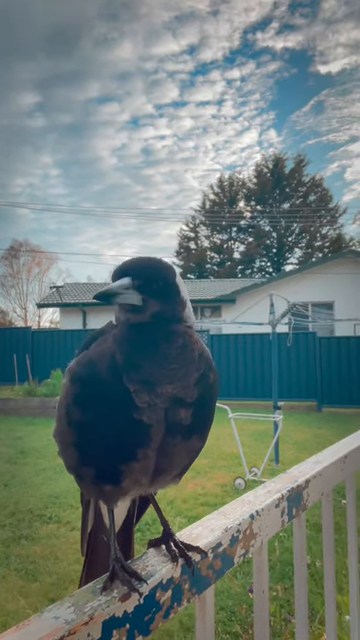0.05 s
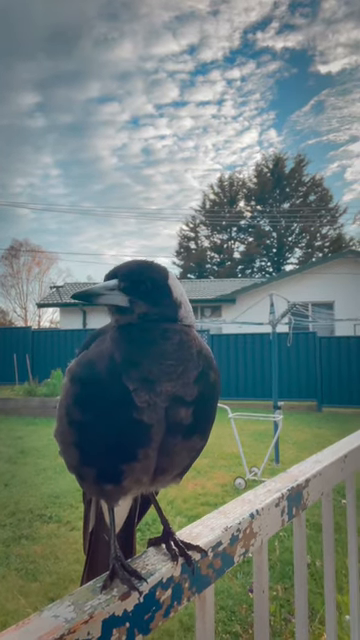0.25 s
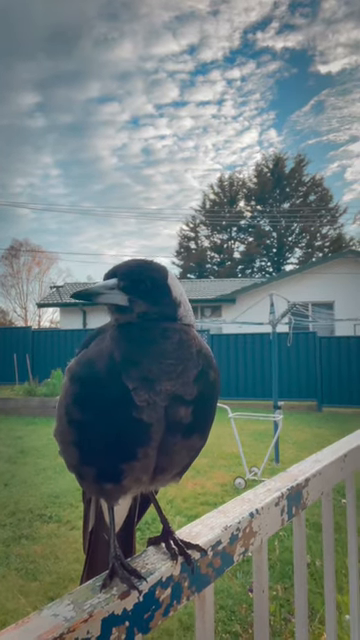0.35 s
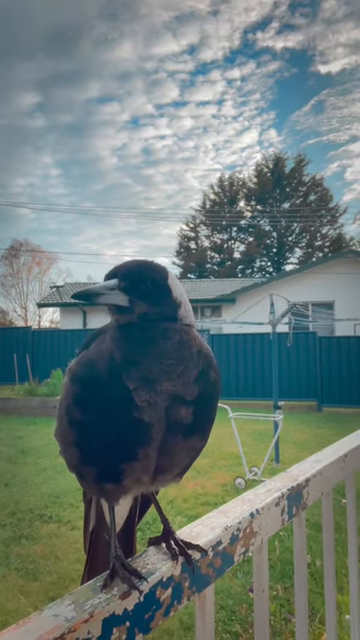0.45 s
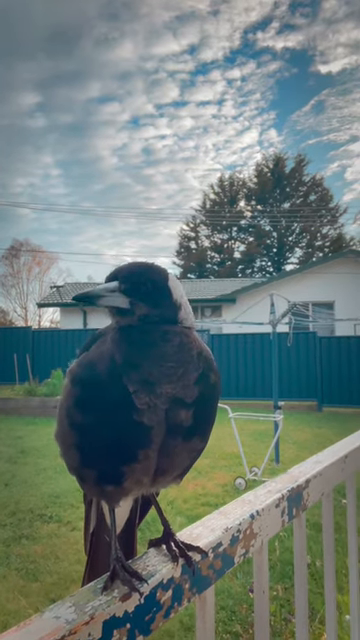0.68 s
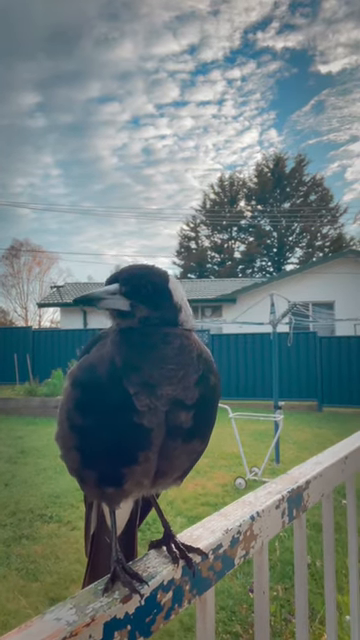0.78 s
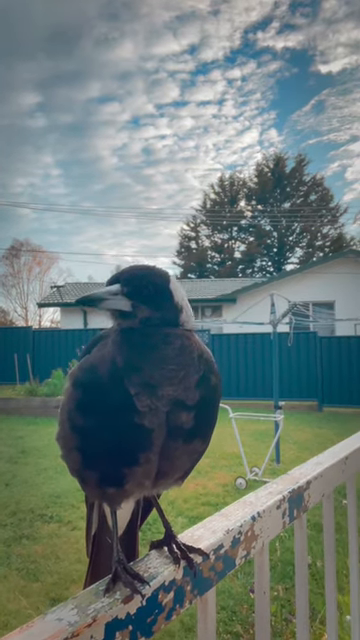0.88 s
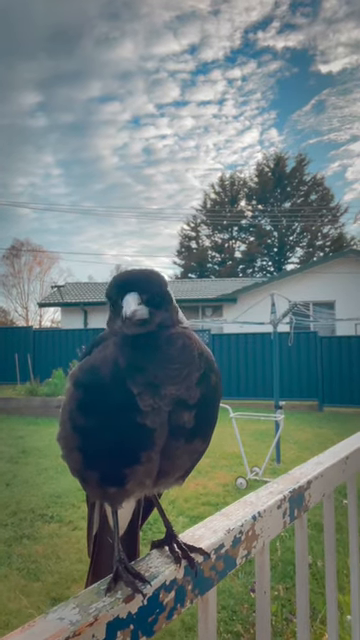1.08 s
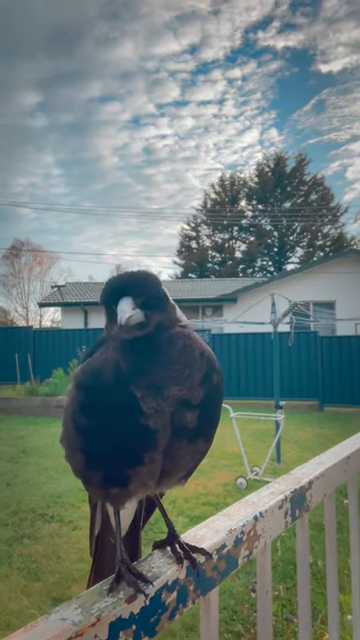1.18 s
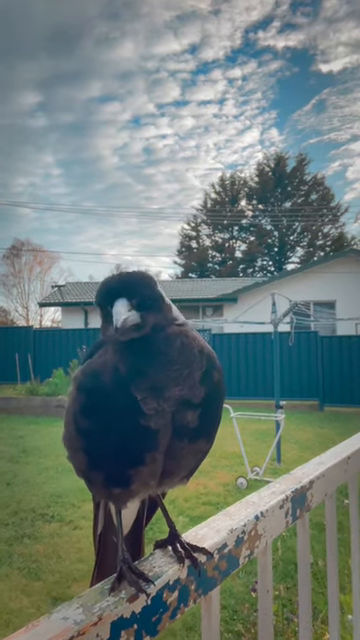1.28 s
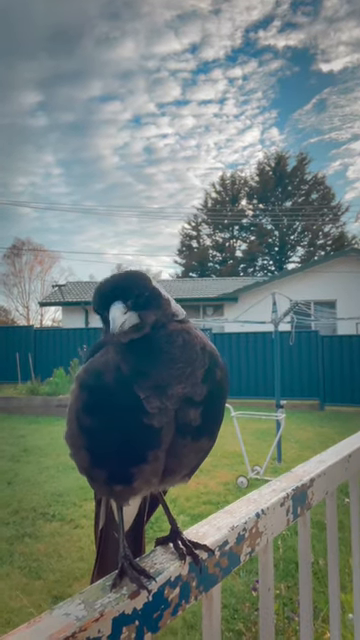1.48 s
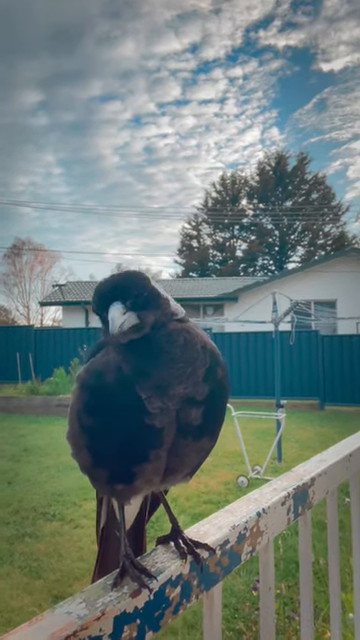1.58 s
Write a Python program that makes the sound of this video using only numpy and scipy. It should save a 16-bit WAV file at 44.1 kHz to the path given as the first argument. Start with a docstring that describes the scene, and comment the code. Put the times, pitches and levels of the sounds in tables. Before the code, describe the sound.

A magpie calls three husky, warbling whistled notes in a quiet backyard, close by

```python
"""A magpie in a backyard gives three husky notes: a falling one, a long rising one, a fainter falling one.
Each is a whistle with overtones whose pitch warbles; it flutters about 240 times a second, with hoarse noise
and rasping air, and passes fixed resonances. A second voice throbs above the falling note; added layers give
the rising note's warble peaks and the faint note's ringing echo. Near surfaces, fences and walls echo it all.
The echo of an earlier call dies away at the start, over far traffic rumble, air hiss and one far whistle."""
import sys
import numpy as np
from scipy import signal
from scipy.fft import rfft, irfft, next_fast_len
from scipy.io import wavfile
from scipy.ndimage import map_coordinates

SR = 44100
rng = np.random.default_rng(int(sys.argv[2]) if len(sys.argv) > 2 else 0)


def store_wav(level_fs):
    """Save 16-bit WAV to argv[1]."""
    pcm = np.round(np.clip(np.atleast_2d(level_fs), -1, 1) * 32767)
    wavfile.write(sys.argv[1], SR, pcm.T.astype(np.int16))


N = 72765  # length in samples
TOP_HZ = 15700  # band limit


def amp(db):
    """Decibels to a linear gain."""
    return 10 ** (np.asarray(db) / 20)


def unit(x):
    """x scaled to an rms of 1."""
    return x / np.sqrt(np.mean(x ** 2) + 1e-20)


def along(points, hz):
    """Read a curve of (frequency_hz, value) points on a log frequency axis."""
    point_hz, value = np.transpose(points)
    return np.interp(np.log(hz + 1), np.log(point_hz + 1), value)


def wobble(rate_hz):
    """A smooth random curve with rate_hz random knots a second."""
    knots = rng.standard_normal(N // 16)
    return map_coordinates(knots, [np.arange(N) * rate_hz / SR])


def filtered(x, response):
    """Shape x in the frequency domain by a complex response of frequency in Hz."""
    size = next_fast_len(N + SR // 2)
    hz = np.fft.rfftfreq(size, 1 / SR)
    return irfft(rfft(x, size) * response(hz), size)[..., :N]


def rush(spectrum, alike):
    """Stereo noise of rms 1; the mid and side shares set the left-right likeness at each frequency."""
    def shares(hz):
        turn = np.arccos(np.clip(along(alike, hz), -1, 1)) / 2
        return amp(along(spectrum, hz)) * [np.cos(turn), np.sin(turn)]

    mid, side = filtered(rng.standard_normal((2, N)), shares)
    return unit(np.array([mid + side, mid - side]))


def gate(start_s, end_s):
    """A smooth switch on and off, with short squared ramps."""
    edge_s = 0.0014
    t = np.arange(N) / SR
    return np.clip(np.minimum(t - start_s, end_s - t) / edge_s, 0, 1) ** 2


def background():
    """Swelling traffic rumble and unsteady air hiss from shaped noise, and one far whistle from a sine."""
    # noise colours: frequency_hz, density_db (per Hz, relative)
    rumble_spectrum = [(18, -67), (30, -30), (46, 0), (66, 2.5), (124, -8.5), (151, -16.5), (300, -23.5),
                       (390, -45), (660, -120)]
    air_spectrum = [(120, -53), (200, -16), (400, -8), (756, -5), (957, -6.5), (1470, -17), (2760, -23),
                    (7100, -33.5), (11200, -36), (14500, -43), (22000, -120)]
    # stereo width: frequency_hz, left-right likeness (-1 to 1)
    likeness = [(60, 1), (130, 0.94), (260, 0.69), (550, -0.68), (1200, 0.1), (2400, -0.23), (5000, 0.7),
                (10000, 0.44), (12000, -0.73), (15000, 0.19)]
    # far whistle: start_s, end_s, pitch_hz, level_db
    start_s, end_s, pitch_hz, level_db = (1.405, 1.47, 1530, -81)
    rumble_db, air_db, pan_db = -64.5, -73, .5  # the pan raises the left and lowers the right
    tone = np.sin(2 * np.pi * pitch_hz * np.arange(N) / SR)
    whistle = amp(level_db) * tone * gate(start_s, end_s)
    rumble = amp(rumble_db + 2.2 * wobble(3.3)) * rush(rumble_spectrum, likeness)
    air = amp(air_db + 0.79 * wobble(9.7)) * rush(air_spectrum, likeness)
    return (rumble + air) * amp([[pan_db], [-pan_db]]) + whistle


def earlier_echo():
    """What is left in the yard of the call before: fading shaped noise."""
    # noise colour: frequency_hz, density_db (per Hz, relative)
    spectrum = [(530, -33), (920, -17.5), (1450, -7.5), (1820, -11), (2070, -34), (2420, -5.5), (3290, -10),
                (3580, -3.5), (4190, -17.5), (7180, -22.5), (7900, -52), (8870, -37.5), (11200, -44),
                (14500, -60), (22000, -120)]
    # fade: time_s, level_db
    fade_points = [(0.0, -50.5), (0.036, -65), (0.071, -63), (0.152, -80), (0.16, -86)]
    # stereo width: frequency_hz, left-right likeness (-1 to 1)
    likeness = [(1000, 0.24), (6000, 0.5)]
    time_s, level_db = np.transpose(fade_points)
    fade = amp(np.interp(np.arange(N) / SR, time_s, level_db)) * gate(-1, time_s[-1])
    return fade * rush(spectrum, likeness)


def early(x):
    """The direct sound and a few strong copies, some inverted, off near surfaces."""
    # near fences, ground and rail: left_delay_s, right_delay_s, level_db, sign
    reflections = [(.0021, .00213, -26.5, -1), (.0052, .00516, -7.5, 1), (.0088, .0089, -7, 1),
                   (0.0143, .0122, -10.5, -1), (.0171, .0176, -12, 1), (.0236, .0228, -14.5, -1)]
    left_s, right_s, level_db, sign = np.transpose(reflections)
    gains = np.sign(sign) * amp(level_db)

    def copies(hz):
        delayed = [gains @ np.exp(-2j * np.pi * np.outer(lag_s, hz)) for lag_s in (left_s, right_s)]
        return 1 + np.array(delayed)

    return filtered(x, copies)


def yard(x):
    """Later echoes of fences and walls: a noise tail in which each frequency dies at its own speed."""
    # decay: frequency_hz, t60_s (time to fall 60 dB)
    decay = [(1000, 0.94), (2400, 0.67), (2800, 0.88), (3600, 1), (5200, 0.76), (10000, 0.14)]
    level_db, delay_s, likeness = -9, 0.014, 0.34
    far_wall_s, beyond_db = .1, -9  # echoes from beyond the farthest wall are weaker
    noise = rush([(1000, 0)], [(1000, likeness)])[:, :SR]
    hz, t, bands = signal.stft(noise, SR, nperseg=256)
    decay_db = -60 * t / along(decay, hz)[:, None]
    step_db = beyond_db * np.clip((t - far_wall_s) / 0.007, 0, 1)
    tail = signal.istft(bands * amp(decay_db + step_db), SR, nperseg=256)[1]
    late = np.pad(x, (round(delay_s * SR), 0))[None]
    return amp(level_db) * signal.fftconvolve(late, tail / np.linalg.norm(tail[0]), axes=1)[:, :N]


def note(rows, tune, warble):
    """A whistle with overtones; warble swings its pitch, flutter and hoarseness shake it, air rasps along."""
    # overtones: multiple, level_db
    overtones = [(2, -7.5), (3, -15), (4, -12.5), (5, -17), (6, -26)]
    # rasping air colour: frequency_hz, density_db (per Hz, relative)
    rasp_spectrum = [(1000, -5.5), (2000, 6), (4000, 3.5), (4400, -6), (5800, -1.5), (7200, -5),
                     (8200, -31), (8900, -0.5), (10500, 0.5), (11500, -32), (15000, -14)]
    flutter_hz, flutter_scatter, flutter_swing = 240, .25, .035  # rate, its wander, share of pitch
    hoarse_share, hoarse_hz = 0.42, 494  # noise on each partial (grows with multiple and depth), its speed
    jitter, jitter_hz = .028, 220  # unsteady share of pitch, its speed
    bloom_db, bloom_s = -12, .09  # opening tilt per multiple, centred on 2.5; gone after bloom_s

    t = np.arange(N) / SR
    time_s, *columns = np.transpose(rows)
    level_db, bright_db, depth, rasp_db, pan_db = [np.interp(t, time_s, c) for c in columns]
    depth = np.clip(depth, 0, 1)
    tune_s, *tune_columns = np.transpose(tune)
    middle_hz, swing = [np.interp(t, tune_s, c) for c in tune_columns]
    warble_hz, top_s, skew, swell_db = warble

    flutter = 2 * np.pi * np.cumsum(flutter_hz * (1 + flutter_scatter * wobble(60))) / SR
    turn = 2 * np.pi * warble_hz * (t - top_s)
    wave = np.cos(turn + skew * (1 - np.cos(turn)))
    flutter_bend = flutter_swing * depth * np.sin(flutter)
    unsteady = jitter * np.sqrt(depth) * wobble(jitter_hz)
    pitch_hz = middle_hz * (1 + swing * wave + flutter_bend + unsteady)
    phase = 2 * np.pi * np.cumsum(pitch_hz) / SR

    def partial(k):
        pure, quarter = np.sin(k * phase), np.cos(k * phase)
        noise = wobble(hoarse_hz) * pure + wobble(hoarse_hz) * quarter
        return pure + hoarse_share * k * depth * noise

    closed_db = bloom_db * np.clip(1 - (t - time_s[0]) / bloom_s, 0, 1)
    bright = 0
    for k, db in overtones:
        below_top = k * pitch_hz < TOP_HZ
        bright = bright + amp(db + (k - 2.5) * closed_db) * partial(round(k)) * below_top
    tone = partial(0.99) + amp(bright_db) * bright  # the lowest partial sits 1 % flat
    tone = tone + amp(rasp_db) * rush(rasp_spectrum, [(1000, 0.92)])[0]
    size = (1 + depth * np.cos(flutter)) * amp(level_db + swell_db * wave)
    return tone * size * gate(time_s[0], time_s[-1]) * amp([pan_db / 2, -pan_db / 2])


def magpie():
    """Three notes, a second voice, warble peaks and a ringing echo, through fixed resonances and dips."""
    # notes, before the resonances: time_s, level_db, overtones_db, flutter depth (0-1),
    # rasp_db (relative to the tone), left_right_db (positive is left)
    falling = [(.155, -76.5, -4, 0.13, -36, -1), (.165, -73.5, 14, 0.34, -29, -2),
               (.185, -63, -1, 0.33, -23, 1), (.21, -53, -3.5, 0.35, -42, 2),
               (.24, -46, -8, 0.54, -40.5, -2.5), (.256, -42.5, -25.5, 0.39, -22.5, 13),
               (.27, -42.5, -9, 0.06, -36, 0), (.288, -43, -25.5, 0.04, -33.5, 2.5),
               (.296, -68.5, -29, 0.4, -32, 3.5)]
    rising = [(.385, -48, 8, .3, -33, 3), (.393, -66, 8.5, 0.27, -33, -7.5),
              (.404, -61, 1, 0.96, -26.5, 10), (.416, -52.5, -1.5, 0.29, -30, 2.5),
              (.44, -43.5, -7, 0.3, -28.5, -0.5), (.466, -47.5, -4.5, 0.142, -30.5, -1.5),
              (.5, -48, -5, 0.18, -12, 0.5), (.54, -51.5, 2, 0.2, -21.5, -3),
              (.556, -50.5, 5, 0.45, -26.5, 5), (.568, -42, -12, 0.043, -21.5, 2),
              (.578, -44, 0, 0.12, -24, -5.5), (.588, -42.5, -14, 0.34, -26.5, 2),
              (.61, -40, -14.5, 0.26, -41.5, -1.5), (.63, -51.5, -4.5, 0.25, -38.5, 0.5),
              (.65, -75, -29, 0.24, -40, 4)]
    faint = [(.752, -88, 6.1, 0.29, -20, -1.4), (.76, -74, 10.3, 0.31, -3, 0.77),
             (.79, -67.5, 2.1, 0.44, -2.5, -1.8), (.825, -59, 3.1, 0.67, -7, -1),
             (.845, -60, 2.7, 0.42, -7.5, -0.71), (.855, -56, 8.2, 0.1, -25, -0.59),
             (.866, -65, 11, 0.23, -11.5, -3.3), (.876, -91, 7.7, 0.36, -2.5, -1.1)]
    # the other side of the voice box, a throbbing strand above the falling note; same columns
    second_voice = [(.16, -73, -28, 0.18, -29, 0.017), (.18, -59.5, -15, 0.9, -32, 0.057),
                    (.2, -53.5, -10, 0.47, -21, 0.01), (.235, -51.5, -18, 0.25, -21, 0),
                    (.25, -53, -6, 0.33, -40, 0)]
    # two warble peaks near 2.4 kHz ending the rising note; same columns
    rising_peaks = [(.582, -56, -38, 0.12, -39.5, 3), (.594, -36, -32.5, 0.057, -40.5, 3),
                    (.604, -63, -34.5, 0.13, -34, 2.6), (.617, -39, -20.5, 0.04, -40.5, 2),
                    (.626, -45.5, -32, 0.104, -33.5, 2.2), (.638, -56.5, -46, 0.18, -44.5, 2)]
    # ringing echo of the faint note near 2.9 kHz, lingering after it; same columns
    faint_ring = [(.78, -57, -37, 0.27, -28, 0.37), (.82, -62, -46, 0.16, -37, 0.15),
                  (.86, -51.5, -44, 0.32, -38.5, 0.97), (.885, -60, -40, 0.17, -36, 1.3),
                  (.93, -58, -41.5, 0.17, -23, 2.2), (.98, -70, -33, 0.4, -38, 0.69),
                  (1.0, -94, -21, 0.12, -32, 0.57)]
    # tunes: time_s, middle_pitch_hz, warble swing (share of pitch)
    falling_pitch = [(.155, 3320, .01), (.17, 3130, .01), (.195, 2880, .04), (.235, 2830, .05),
                     (.248, 2720, .05), (.264, 2370, .01), (.3, 2330, .005)]
    rising_pitch = [(.385, 1270, 0), (.395, 1150, 0), (.405, 900, 0), (.415, 1380, .03), (.425, 1400, .03),
                    (.45, 1520, .045), (.48, 1680, .045), (.52, 1850, .04), (.57, 2020, .065),
                    (.6, 2090, .02), (.65, 2130, .02)]
    faint_pitch = [(.752, 3045, 0), (.775, 2900, .02), (.8, 2920, .05), (.84, 2850, .03), (.852, 2590, 0),
                   (.885, 2570, 0)]
    second_pitch = [(.16, 3760, 0.014), (.19, 3464, 0.0067), (.25, 3416, 0.025)]
    peaks_pitch = [(.58, 2260, 0.042), (.594, 2355, 0.0095), (.618, 2403, 0.0077), (.655, 2226, 0.014)]
    ring_pitch = [(.78, 2905, 0.0051), (.86, 2894, 0.014), (.96, 2826, 0.015), (1.065, 2870, 0.048)]
    # warbles: warble_hz, pitch_top_s, skew (0 even to 1 slow rise and quick fall), level_swing_db
    falling_warble = (86, .212, .6, .5)
    rising_warble = (43, .523, .1, 2.5)
    faint_warble = (42, .812, .3, .5)
    second_warble = (53, .19, 0.61, 3.2)
    # resonances and dips of the voice: centre_hz, width_hz, gain_db
    resonances = [(2122, 52, 1.5), (2368, 322, 9.5), (3650, 390, 6), (5108, 67, 6.5), (5560, 1400, 7),
                  (9880, 2400, 2)]
    dips = [(4500, 1180, -7), (8150, 1770, -26.5)]

    def peak(hz, centre_hz, width_hz, gain):
        off_centre = centre_hz * centre_hz - hz * hz
        return (off_centre + 1j * hz * width_hz * gain) / (off_centre + 1j * hz * width_hz)

    def path(hz):
        return np.prod([peak(hz, c, w, amp(db)) for c, w, db in resonances + dips], axis=0)

    voice = note(falling, falling_pitch, falling_warble)
    voice = voice + note(rising, rising_pitch, rising_warble)
    voice = voice + note(faint, faint_pitch, faint_warble)
    voice = voice + note(second_voice, second_pitch, second_warble)
    voice = voice + note(rising_peaks, peaks_pitch, rising_warble)
    voice = voice + note(faint_ring, ring_pitch, faint_warble)
    return filtered(voice, path)


def scene():
    """The bird with its echoes, split into shared and opposite parts, over the yard and the background."""
    # treble curve shared by both channels: frequency_hz, gain_db
    shared_treble = [(9000, -6), (10300, -18), (11200, -27), (12500, -37.5)]
    # part with opposite sign on the two channels: frequency_hz, gain_db
    opposite_treble = [(1000, -13), (5000, -9.5), (9000, -20.5), (12000, -15), (15000, -16)]
    bird = early(magpie())
    shared = filtered(bird, lambda hz: amp(along(shared_treble, hz)))
    # 1j shifts the opposite part by a quarter cycle
    opposite = filtered(bird.mean(0), lambda hz: 1j * amp(along(opposite_treble, hz)))
    direct = shared + opposite * [[1], [-1]]
    return direct + yard(shared.mean(0)) + earlier_echo() + background()


def record(dry):
    """Nothing above the band limit but the faint converter hiss."""
    hiss_db = -106
    return filtered(dry, lambda hz: hz < TOP_HZ) + amp(hiss_db) * rng.standard_normal(dry.shape)


dry = scene()
out = record(dry)
store_wav(out)
```